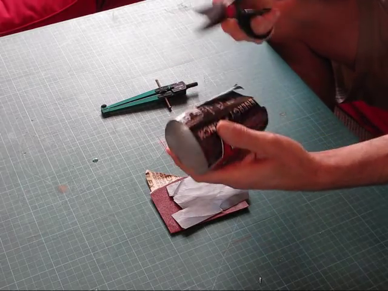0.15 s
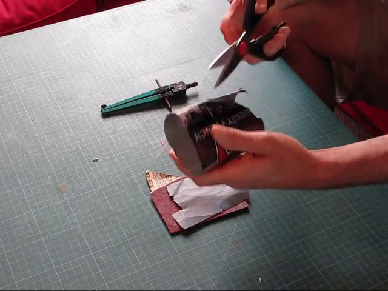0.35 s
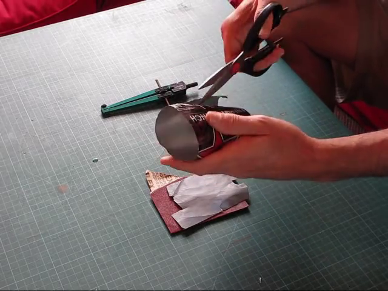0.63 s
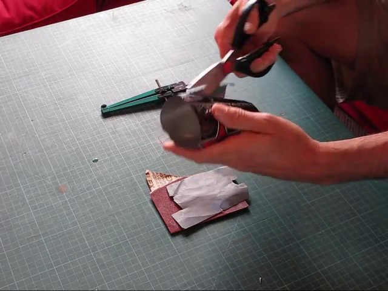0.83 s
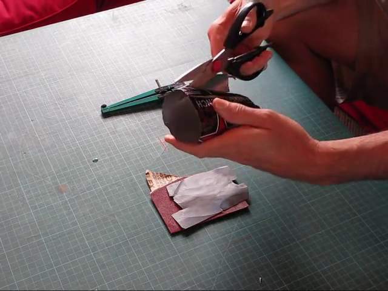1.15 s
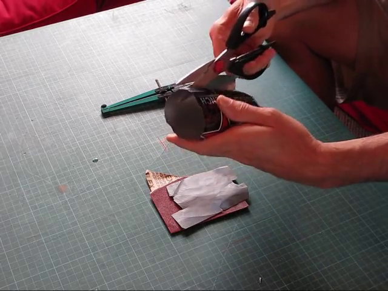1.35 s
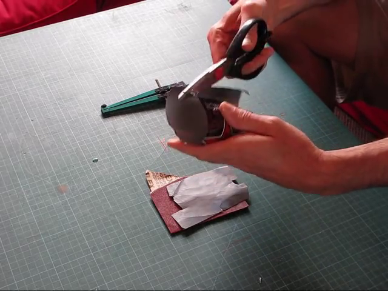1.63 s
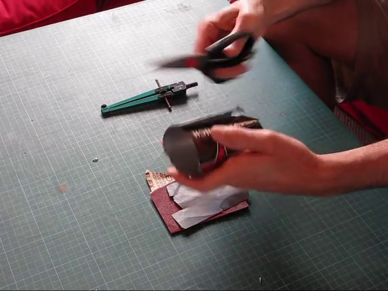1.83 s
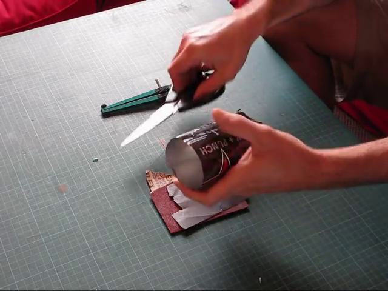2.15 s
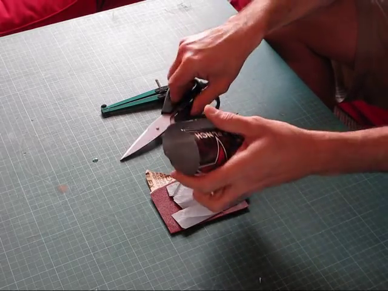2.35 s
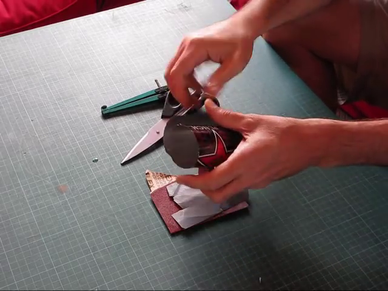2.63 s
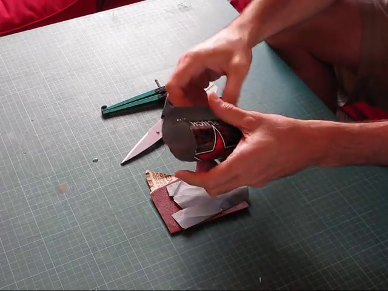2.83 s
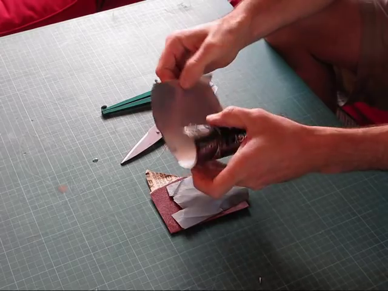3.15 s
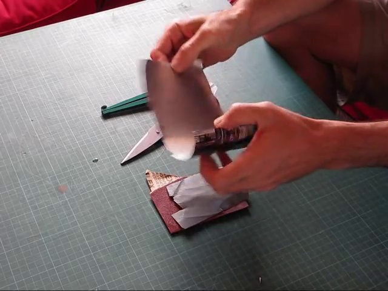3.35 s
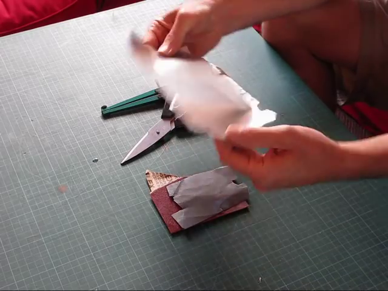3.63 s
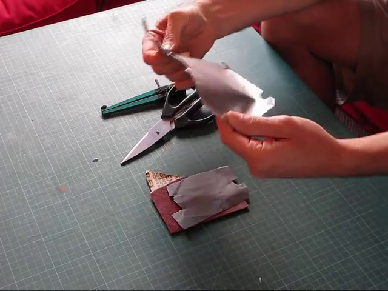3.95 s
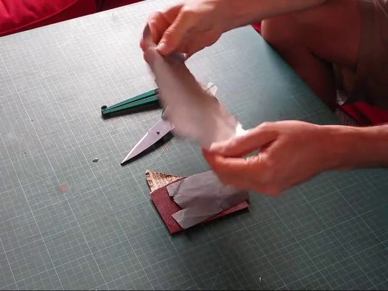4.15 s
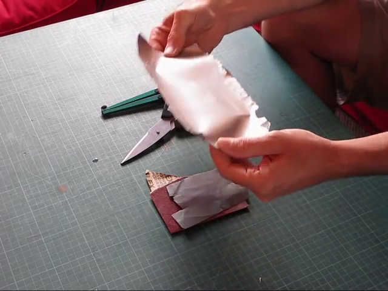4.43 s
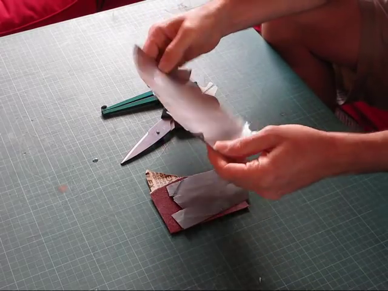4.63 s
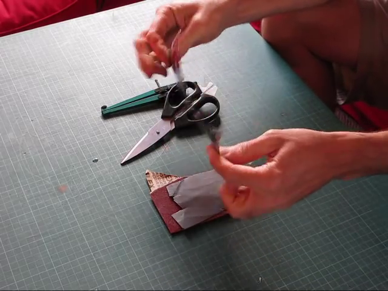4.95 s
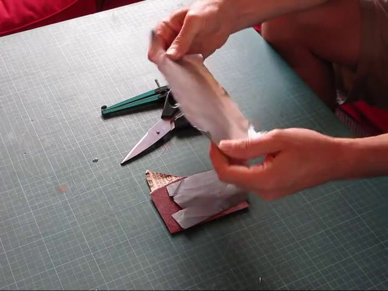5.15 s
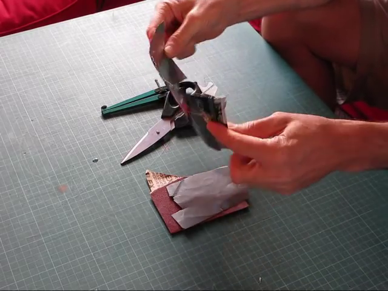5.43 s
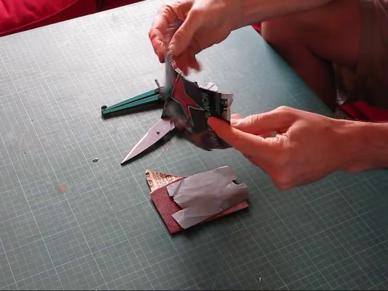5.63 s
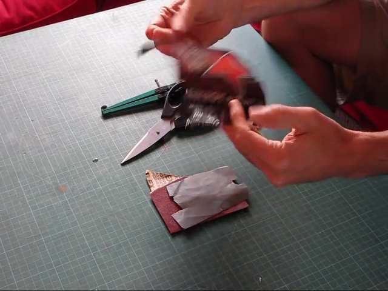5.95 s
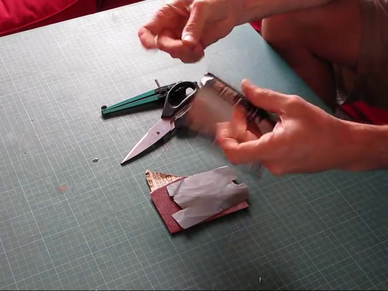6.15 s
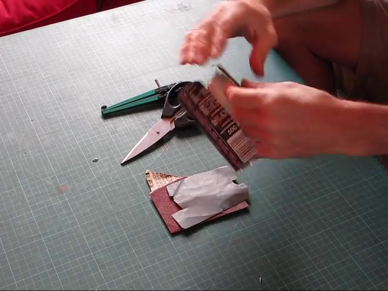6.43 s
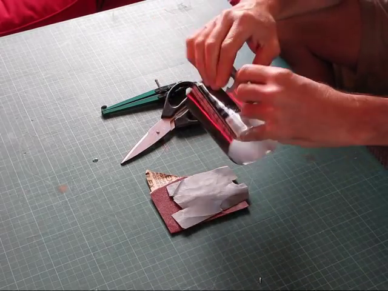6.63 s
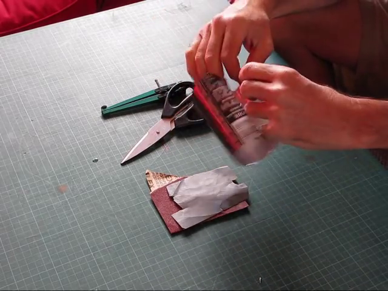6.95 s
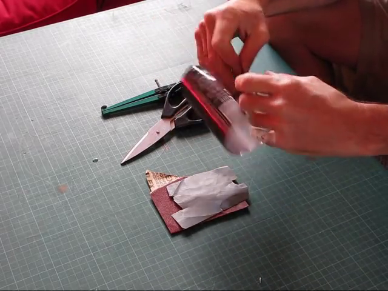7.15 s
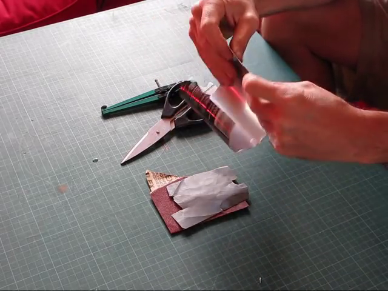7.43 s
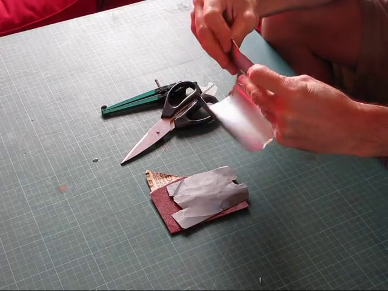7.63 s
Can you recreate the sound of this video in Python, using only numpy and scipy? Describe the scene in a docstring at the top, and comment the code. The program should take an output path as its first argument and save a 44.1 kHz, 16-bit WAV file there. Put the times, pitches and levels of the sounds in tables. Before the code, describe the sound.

Sharp snips in a drinks can and scissors knocking onto a table, followed by thin metal buckling, cracking and clicking in a quiet room.

```python
"""Scissors snip, scrape and squeal through the last of a thin aluminium can, then land on the work table.
Fingers shift on the metal. From 3.4 s two hands bend the opened wall flat, so that it crinkles and
buckles with loud, ringing snaps. Near 6 s it curls back into a tube and knocks on the table, and its
edges click and scrape over each other. All along there is the soft noise of a small room, and a camera's
gain control turns the sound down after each snap."""
import sys
import numpy as np
from scipy import signal
from scipy.io import wavfile
from scipy.ndimage import uniform_filter1d

SR = 44100
rng = np.random.default_rng(int(sys.argv[2]) if len(sys.argv) > 2 else 0)


def dump_mix(stems):
    """Bounce the given channels to the path in sys.argv[1] as a 16-bit WAV at rate SR."""
    frames = np.atleast_2d(stems).T  # one column per channel
    limited = np.clip(frames, -1, 1)  # hard clip at full scale
    pcm = np.round(limited * 32767).astype(np.int16)
    wavfile.write(sys.argv[1], SR, pcm)


N = 343526

# The tone of the opened sheet: pitch_hz, level_db
SHEET_TONE = [(60, -31), (200, -22), (400, -8), (650, -2.5), (1150, -3.5), (2100, -3), (3000, -2),
              (4200, -8.5), (7000, -15.5), (9500, -25.5), (15000, -33.5)]
# The notes it rings at: pitch_hz, level_db, fade_s (time to fall by 60 dB)
SHEET_NOTES = [(463, 3, 0.28), (668.4, 12, 0.16), (934, 4, 0.34), (1530, 1, 0.41), (1800, -17, 0.19),
               (1920, 10, 0.21), (2170, 7, 0.33), (2360, -13, 0.23), (2540, 8, 0.3), (2750, 5, 0.1),
               (2840, 6, 0.18), (3320, -8.5, 0.25), (3800, 9.5, 0.08)]
# Its snaps: start_s, crack_db, ring_db, treble_db, pitch_hz
SHEET_SNAPS = [(3.404, -17, -26.5, -5, 1297), (3.562, -46, -38.5, -24, 740),
               (3.602, -52, -38.5, -29.5, 900), (3.62, -17, -18, -0.5, 1077),
               (3.654, -17.5, -21.5, -24, 586), (3.6928, -4.5, -13, 6, 1800), (3.7175, -8, -13.5, 7, 2060),
               (3.767, -15, -20, 7, 1800), (4.0695, -19.5, -22, 4.5, 1850), (4.087, -28, -23, -5, 1660),
               (4.119, -5, -18, 5.5, 1984), (4.146, -10.5, -13, 4, 2155), (4.2843, 1.5, -11, 11.5, 2083),
               (4.617, -36, -27.5, -12, 835), (4.65, -43, -29.5, -15.5, 723), (4.719, -44, -43.5, -31, 750),
               (4.7515, -10.5, -13.5, 3, 2515), (4.8815, -6.5, -14, 5, 1474),
               (5.059, -32.5, -25.5, 2, 2144), (5.0885, -15.5, -16.5, 5.5, 2170),
               (5.138, -19, -16, 7, 2150), (5.263, -25, -22, -8, 756), (5.2987, -10.5, -13, 1.5, 2250),
               (5.3435, -11.5, -32, -9, 2750), (5.523, -32, -34, 2, 1860), (5.9155, -10, -19, 1.5, 2420),
               (6.0445, -21, -23, -1, 3140), (6.058, -14.5, -23.5, 7.5, 3110)]
def sheet_snaps():
    """The bent sheet buckles: it jumps to a new shape, cracks and rings."""
    return blows(SHEET_SNAPS, SHEET_TONE, SHEET_NOTES, crack_s=0.0058, chime_db=-10.5,
                 note_db=-3, note_fade_s=0.12, detune=0.012, bump_db=3, ripple_db=2,
                 level_db=0.5, bass_db=-3.5, thinning=0.45)


# Moments when the microphone overloads: start_s, click_db, thud_db
OVERLOADS = [(0.6916, 3.5, -1), (1.6155, -33, -14), (1.7007, -2, -8.5), (3.6938, 5, 7), (4.12, -4.5, -8),
             (4.2859, 8.5, 6), (4.883, 4, -2), (5.1403, 1, -10), (5.2993, -5, -12), (5.7595, -4.5, -29),
             (7.6671, -3.5, -9.5)]
def overload_clicks(click_s=0.00028, thud_s=0.00023):
    """The hardest snaps and snips overload the microphone, which spits a brief click with a low thud."""
    out, t = np.zeros(N), np.arange(SR // 100) / SR
    no_bass = signal.butter(1, 1500, "highpass", fs=SR, output="sos")
    for start_s, click_db, thud_db in OVERLOADS:
        burst = signal.sosfilt(no_bass, rng.choice([-1., 1.], len(t)) * np.exp(-t / click_s))
        add(out, start_s, gain_of(click_db) * burst + gain_of(thud_db) * np.exp(-t / thud_s))
    return out


# The tone of the can as a tube: pitch_hz, level_db
TUBE_TONE = [(60, -51), (300, -30), (700, -13.5), (980, -3.5), (1150, 3), (1290, 4.5), (1420, -0.5),
             (1700, -0.5), (2600, -1.5), (4000, -2), (7000, -9.5), (9500, -26.5), (15000, -28.5)]
# The notes it rings at: pitch_hz, level_db, fade_s
TUBE_NOTES = [(1193, 14, 0.084), (1228, -0.5, 0.46), (1280, 3, 0.29), (1342, 0, 0.6), (1472, 4, 0.39),
              (1535, -8, 0.5), (2150, -2, 0.74), (2347, 0.5, 0.34), (3180, 6, 0.14), (3470, -3.5, 0.38),
              (3820, -29, 0.5)]
# Snips and edge clicks: start_s, crack_db, ring_db, treble_db, pitch_hz
SNIPS_AND_CLICKS = [(.2715, -21.5, -28, -3.5, 1295), (.632, -23, -28, -5.5, 1490),
                    (.6916, -10, -18, -1, 3800), (.8822, -13.5, -24, -2.5, 1214),
                    (1.111, -31.5, -41, -4, 1230), (1.166, -38, -43.5, -3, 1190),
                    (1.2517, -24.5, -31, 6.5, 1250), (1.261, -25, -40, 12, 1230),
                    (1.293, -25, -31, 9, 1115), (1.429, -27.5, -31.5, 4, 1200),
                    (1.488, -38, -36.5, 3, 1250), (1.6145, -16, -38, 3.5, 1230),
                    (1.6995, -12.5, -27.5, 5, 1310), (1.8308, -12.5, -14.5, -4.5, 1283),
                    (1.8545, -19, -34, -20, 1280), (1.94, -24.5, -30.5, -16, 1280),
                    (5.7585, -15.5, -18.5, 7.5, 3390), (6.2365, -16, -28, 5.5, 1280),
                    (6.254, -16.5, -25, -7, 1304), (6.364, -28.5, -38, 10, 1322),
                    (6.649, -30, -38.5, 10.5, 1090), (6.7205, -20, -31.5, 10, 2410),
                    (6.958, -24, -30, 7.5, 4200), (7.643, -17, -23.5, 0, 3480),
                    (7.6655, -11, -29.5, 6, 1125), (7.687, -21, -43, 12, 1140)]
def tube_clicks():
    """A snip or a click of the cut edges makes the tube ring."""
    return blows(SNIPS_AND_CLICKS, TUBE_TONE, TUBE_NOTES, crack_s=0.0029, chime_db=-13,
                 note_db=-9, note_fade_s=0.17, detune=0.0039, bump_db=5.5, ripple_db=3,
                 level_db=2, bass_db=3.5, thinning=0.75)


# Bends of the sheet: start_s, length_s, level_db, treble_db
SHEET_BENDS = [(3.7, 0.14, -23, 6), (4.08, 0.17, -19, 3.5), (4.29, 0.046, -7, -2.5),
               (4.35, 0.038, -16.5, 0), (4.78, 0.065, -25, 3), (4.9, 0.038, -22, 9), (5.09, .075, -18, 0.5),
               (5.32, 0.041, -18.5, 0.5), (5.45, 0.03, -27.5, -10)]
def sheet_crinkles():
    """The sheet gives way in tiny, very uneven ticks as it is bent."""
    return friction(SHEET_BENDS, SHEET_TONE, SHEET_NOTES, slips_per_s=260, spread_db=6.2, echo_db=0.5,
                    chime_db=-3, ripple_db=1.5, attack_s=0.0092, drift_db=-2, release_s=0.0069)


# Strokes along the tube: start_s, length_s, level_db, treble_db
TUBE_SCRAPES = [(0, 0.11, -27.5, -3.5), (.76, 0.085, -30.5, -3), (.9, 0.083, -21, 0), (1.0, 0.048, -25, -5),
                (1.33, 0.04, -37.5, 4.5), (1.445, 0.013, -25.5, -5), (1.575, .04, -21.5, -0.5),
                (1.67, 0.18, -33.5, 3), (1.86, 0.066, -32, 7.5), (1.97, 0.095, -47, 12),
                (5.885, 0.2, -29, 7), (6.06, 0.06, -23, 4), (6.125, 0.016, -18.5, 5),
                (6.22, 0.089, -28, 7.5), (6.34, .12, -40.5, 7.5), (6.67, 0.022, -30.5, -11),
                (6.915, 0.0091, -29.5, 5.5), (6.99, 0.018, -36, 4), (7.105, 0.0077, -40.5, 17.5),
                (7.17, 0.044, -39.5, 9.5), (7.305, .04, -40.5, 7), (7.41, 0.025, -41, 12.5),
                (7.68, .12, -36, 11.5)]
def tube_scrapes():
    """Blades and cut edges catch and slip along the tube."""
    return friction(TUBE_SCRAPES, TUBE_TONE, TUBE_NOTES, slips_per_s=280, spread_db=2, echo_db=6.5,
                    chime_db=1.5, ripple_db=2, attack_s=0.004, drift_db=-3.5, release_s=0.014)


# The tone of the work table: pitch_hz, level_db
TABLE_TONE = [(50, -36), (130, -7.5), (230, -8.5), (500, 0.5), (750, 0), (950, -5.5), (1300, -9.5),
              (2200, -7.5), (4000, -7.5), (7000, -13.5), (15000, -33.5)]
# The notes it rings at: pitch_hz, level_db, fade_s
TABLE_NOTES = [(239, 3, .33), (323, -5, .6), (408, -3, .36), (454, 0, .3), (538, -2, .22), (586, -1, .3),
               (667, -1, .3), (1275, -6, .28), (2050, -7, .22)]
# Landings on it: start_s, crack_db, ring_db, treble_db, pitch_hz
TABLE_KNOCKS = [(2.2778, -18.5, -22.5, -7, 454), (2.324, -23.5, -26.5, -7.5, 594),
                (2.352, -26, -34.5, -14, 233), (2.433, -25.5, -26, -6.5, 415), (2.4708, -18, -21, -7, 411),
                (6.11, -16.5, -37, -23, 1100)]
def table_knocks():
    """The scissors, and later the curled sheet, land on the table with low knocks."""
    return blows(TABLE_KNOCKS, TABLE_TONE, TABLE_NOTES, crack_s=0.0026, chime_db=2,
                 note_db=-2.5, note_fade_s=0.2, detune=0, bump_db=0, ripple_db=2,
                 level_db=4, bass_db=-6, thinning=0.5)


# Squeals along the cut edge: start_s, length_s, level_db, first_pitch_hz, last_pitch_hz
BLADE_SQUEALS = [(0.944, 0.031, -36, 3950, 4200), (1.563, 0.13, -34.5, 2300, 4300),
                 (2.004, 0.097, -42, 2230, 2200)]
def blade_squeals(width_hz=320, overtone=1.62, overtone_db=-8, glide_s=0.067):
    """Fast slips sound two notes of the blade, which slide as the contact point moves, then hold."""
    out = np.zeros(N)
    narrow = signal.butter(2, width_hz / 2, fs=SR, output="sos")
    for start_s, length_s, level_db, first_hz, last_hz in BLADE_SQUEALS:
        gain = gain_of(level_db) * push(length_s, attack_s=0.0069, drift_db=-3, release_s=0.016)
        glide = np.minimum(np.arange(len(gain)) / SR / glide_s, 1) ** 2
        turns = np.cumsum(first_hz + (last_hz - first_hz) * glide) / SR
        for ratio, part_db in [(1, 0), (overtone, overtone_db)]:
            noise = rng.standard_normal(SR) + 1j * rng.standard_normal(SR)
            waver = signal.sosfilt(narrow, noise)[:len(gain)]
            note = (waver * np.exp(2j * np.pi * ratio * turns)).real
            add(out, start_s, gain * gain_of(part_db) * evened(note))
    return out


# Finger movements: start_s, length_s, level_db, treble_db
FINGER_SHIFTS = [(.52, 0.02, -46.5, 2), (2.77, 0.034, -51, 12.5), (2.99, 0.029, -44, 1),
                 (3.04, 0.012, -41, -20), (3.21, 0.013, -40.5, -1.5), (3.3, 0.12, -59, 4)]
def finger_rustles():
    """Fingers slide on the can in many soft little slips."""
    return friction(FINGER_SHIFTS, SHEET_TONE, SHEET_NOTES, slips_per_s=900, spread_db=3, echo_db=-2,
                    chime_db=-10, ripple_db=2, attack_s=0.012, drift_db=-0.5, release_s=0.013)


# How long can and room ring together: pitch_hz, fade_s
ECHO_FADES = [(100, 1), (400, 0.37), (1300, 0.36), (4000, 0.25), (8000, 0.3), (16000, 0.27)]
def echo(t):
    """Countless faint notes and wall echoes blur into noise whose bass lasts longest."""
    hz, age_s, bands = signal.stft(rng.standard_normal(len(t)), SR, nperseg=256)
    fade = gain_of(-60 * age_s / read(ECHO_FADES, hz)[:, None])
    return signal.istft(bands * fade, SR, nperseg=256)[1][:len(t)]


# The tone of the room's noise: pitch_hz, level_db
ROOM_TONE = [(20, -10), (60, -3.5), (150, -0.5), (300, -1), (700, -2), (1300, -5), (2200, -11),
             (4000, -15.5), (7000, -23.5), (10000, -31), (16000, -41.5)]
def room_noise(level_db=-43.5):
    """The room gives a soft, steady, low noise."""
    return gain_of(level_db) * evened(colour(rng.standard_normal(N), ROOM_TONE, size=8192))


def blows(rows, body, notes, crack_s, chime_db, note_db, note_fade_s, detune, bump_db, ripple_db,
          level_db, bass_db, thinning, swell_s=0.0022):
    """Each blow is a short crack, then the struck thing rings in the room."""
    out, t = np.zeros(N), np.arange(SR * 2 // 3) / SR
    head, early = SR // 250, SR // 28  # the first 4 ms set the crack's level, 36 ms the ring's
    for start_s, crack_db, ring_db, treble_db, hz in rows:
        low_db = bass_db - thinning * (crack_db + 10)  # harder cracks have less bass
        tone = [(480, low_db), (950, 0.0045), (2600, 0.0044), (5500, treble_db)]
        # the spot that is hit favours the notes near one pitch
        bump = [(hz / 1.8, 0), (hz, bump_db), (hz * 1.64, 0)]
        ripple = spot_tone(ripple_db)
        # the first jolt, among its echoes from the edges of the metal
        jolt = rng.standard_normal(len(t)) * np.exp(-t / crack_s)
        jolt[SR // 4000] += 2.5
        crack = colour(jolt, body, tone)
        main_notes = [(hz, 0, note_fade_s), (hz * 1.1, -3, note_fade_s)]
        parts = [(0, colour(echo(t), body, tone, bump, ripple)),
                 (chime_db, chime(t, notes, detune)),
                 (note_db, chime(t, main_notes, detune=0.002))]
        ring = sum(gain_of(db) * part / part[:early].std() for db, part in parts)
        ring *= 1 - np.exp(-t / swell_s)
        add(out, start_s, gain_of(crack_db) * crack / crack[:head].std())
        add(out, start_s, gain_of(ring_db) * ring / ring[:early].std())
    return gain_of(level_db) * out


def friction(strokes, body, notes, slips_per_s, spread_db, echo_db, chime_db, ripple_db,
             attack_s, drift_db, release_s, spots=4):
    """Tiny slips of uneven size shake a few spots of the metal, which ring on."""
    size = gain_of(spread_db * np.minimum(rng.exponential(1, N), 4))
    slips = size * rng.choice([-1, 1], N) * (rng.random(N) < slips_per_s / SR)
    # even out the slips, so the push of the hand sets the loudness
    slips /= np.sqrt(abs(uniform_filter1d(slips ** 2, size=1300)) + 0.0011)
    low = signal.sosfilt(signal.butter(1, 3500, fs=SR, output="sos"), slips)
    force, bite = np.zeros((2, N))
    for start_s, length_s, level_db, treble_db in strokes:
        gain = gain_of(level_db) * push(length_s, attack_s, drift_db, release_s)
        add(force, start_s, gain)
        add(bite, start_s, gain * gain_of(treble_db))
    drive = force * low + bite * (slips - low)
    # the contact lands on a random spot every hundredth of a second
    touched = rng.integers(0, spots, N)[np.arange(N) // (SR // 100)]
    out, t = np.zeros(N), np.arange(SR // 2) / SR
    for spot in range(spots):
        ripple = spot_tone(ripple_db)
        parts = [(0, colour(signal.unit_impulse(len(t)), body, ripple)),
                 (echo_db, colour(echo(t), body, ripple)),
                 (chime_db, chime(t, notes, detune=0.0044))]
        ring = sum(gain_of(db) * part / np.linalg.norm(part) for db, part in parts)
        add(out, 0, signal.oaconvolve(drive * (touched == spot), ring / np.linalg.norm(ring)))
    return out


def chime(t, notes, detune):
    """The strongest notes ring and fade; each new bend of the metal shifts them a little."""
    hz, level_db, fade_s = np.transpose(notes)[:, :, None]
    shift, glide = detune * rng.standard_normal((2, len(hz), 1))
    turns = hz * (t * (1 + shift) + glide * t ** 2) + rng.random(hz.shape)
    return (gain_of(level_db - 60 * t / fade_s) * np.sin(2 * np.pi * turns)).sum(0)


def spot_tone(ripple_db, count=48):
    """Each spot favours its own notes: random rows of pitch_hz, level_db."""
    return np.c_[np.geomspace(SR / 100, SR / 5, count), ripple_db * rng.standard_normal(count)]


def push(length_s, attack_s, drift_db, release_s):
    """The strength of one push: the hand takes hold, its pressure drifts, then it lets go."""
    t = np.arange(0, length_s + 6 * release_s, 1 / SR)
    grip = np.minimum(t / attack_s, 1)
    drift = gain_of(drift_db * (np.minimum(t / length_s, 1) - 0.5))
    return grip * drift * np.exp(-np.maximum(t - length_s, 0) / release_s)


def colour(x, *tones, size=2048):
    """Shapes a sound with all the tone curves at once; nothing rings before it is struck."""
    hz = abs(np.fft.fftfreq(size, 1 / SR))
    log_gain = np.log(gain_of(sum(read(tone, hz) for tone in tones)))
    taps = np.fft.ifft(np.exp(np.conj(signal.hilbert(log_gain)))).real
    return signal.oaconvolve(x, taps)[:len(x)]


def read(curve, hz):
    """Looks up a curve between its listed pitches."""
    pitches, values = np.transpose(curve)
    return np.interp(np.log(hz + 1), np.log(pitches + 1), values)


def gain_of(db):
    """Turns decibels into a multiplier."""
    return 10 ** (np.asarray(db) / 20)


def evened(x):
    """Scales a sound to an average power of one."""
    return x / np.sqrt(np.mean(x ** 2) + 1e-20)


def add(mix, start_s, sound):
    """Mixes a sound in at its start time."""
    part = mix[max(round(start_s * SR), 0):][:len(sound)]
    part += sound[:len(part)]


def smooth(x, lag_s):
    """Follows a signal with a short lag."""
    memory = np.exp(-1 / (lag_s * SR))
    return signal.lfilter([1 - memory], [1, -memory], x)


# The microphone's opening cuts two dips in the treble: pitch_hz, level_db
MICROPHONE_TONE = [(20, -0.5), (4750, -3), (5200, -10), (5550, -14.5), (6200, -5), (9400, -6),
                   (10300, -18.5), (11200, -18.5), (12200, -15.5), (13300, -3), (16000, -2)]
def scene():
    """Can, scissors, table and room take on the microphone's tone; its overload clicks go on top."""
    hits = tube_clicks() + sheet_snaps() + table_knocks()
    rubbing = tube_scrapes() + sheet_crinkles() + finger_rustles() + blade_squeals()
    return (colour(hits + rubbing + room_noise(), MICROPHONE_TONE) + overload_clicks())[None]


def record(dry, threshold_db=-21, squeeze=0.51, recovery_db_per_s=55, attack_s=0.0014, top_hz=16200):
    """Gain control ducks too late for each snap, whose first peaks flatten; the top treble is cut."""
    power_db = 10 * np.log10(smooth(dry[0] ** 2, lag_s=0.0049) + 1e-12)
    fall_db = np.arange(N) * recovery_db_per_s / SR
    held_db = np.maximum.accumulate(power_db + fall_db) - fall_db  # jumps up, sinks slowly
    over_db = np.maximum(held_db - threshold_db, 0)
    ducked = dry / gain_of(squeeze * smooth(over_db, attack_s))
    flattened = np.clip(ducked, -0.76, 0.76)
    treble_cut = signal.firwin(255, top_hz, window=("kaiser", 8), fs=SR)
    return signal.oaconvolve(flattened, treble_cut[None], "same")


dry = scene()
out = record(dry)
dump_mix(out)
```